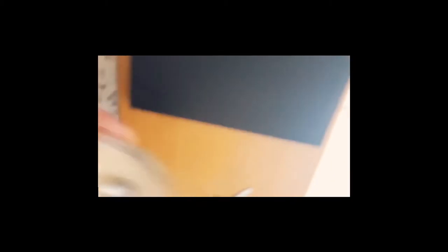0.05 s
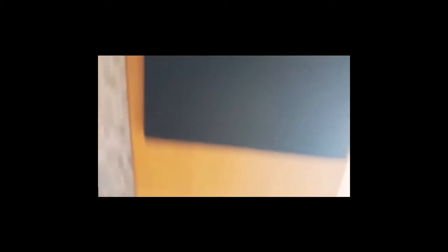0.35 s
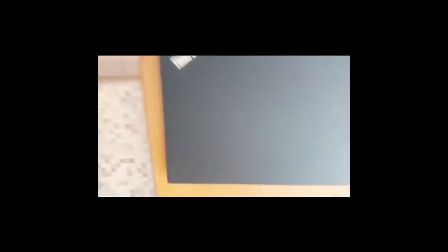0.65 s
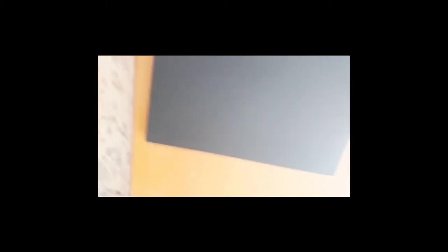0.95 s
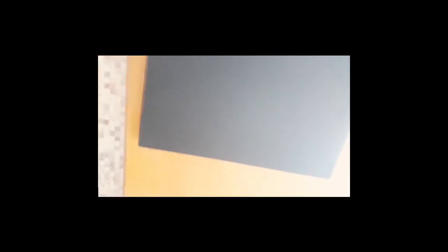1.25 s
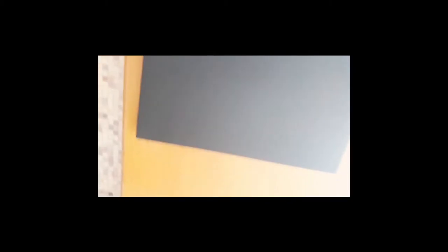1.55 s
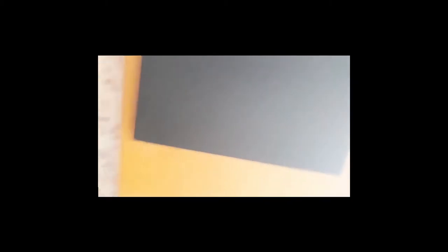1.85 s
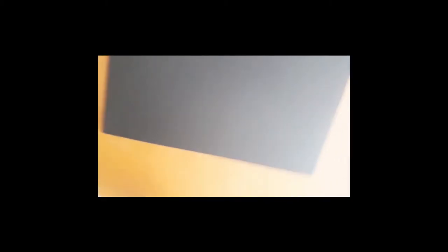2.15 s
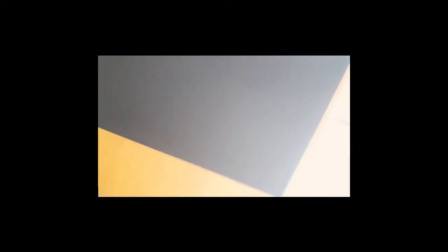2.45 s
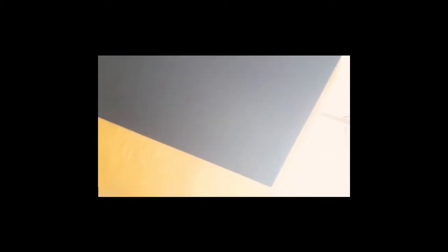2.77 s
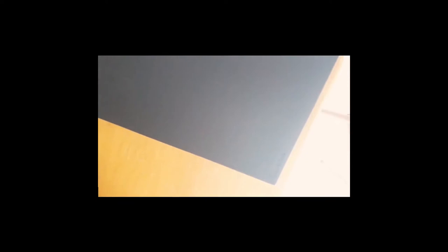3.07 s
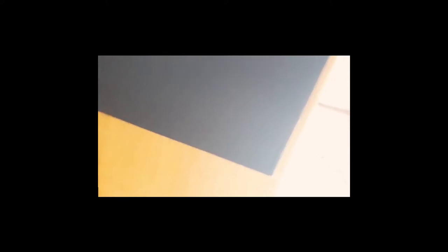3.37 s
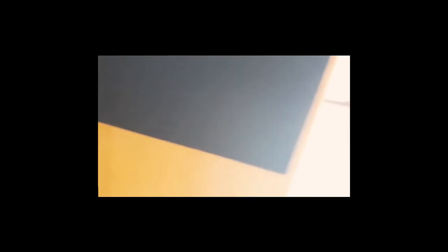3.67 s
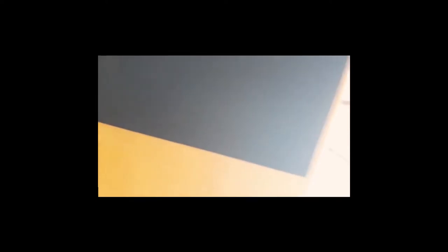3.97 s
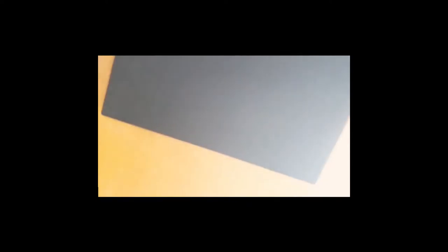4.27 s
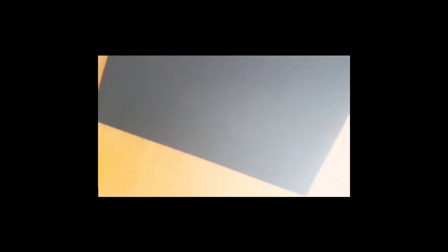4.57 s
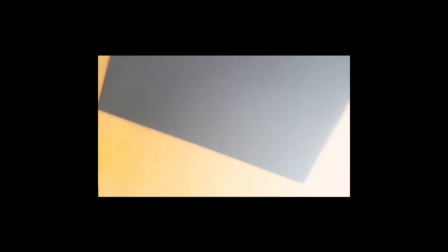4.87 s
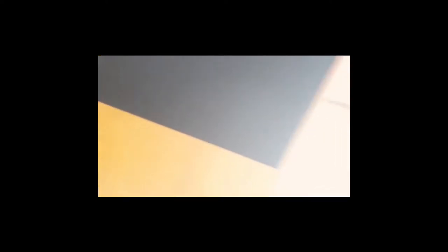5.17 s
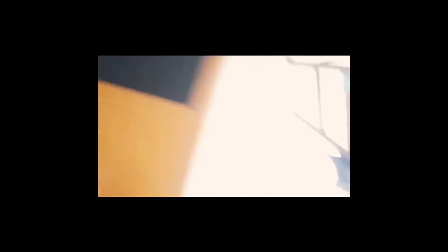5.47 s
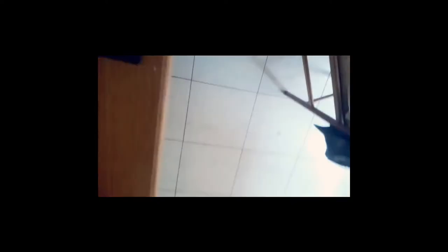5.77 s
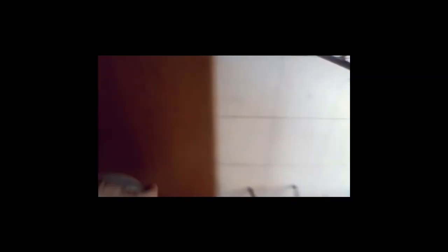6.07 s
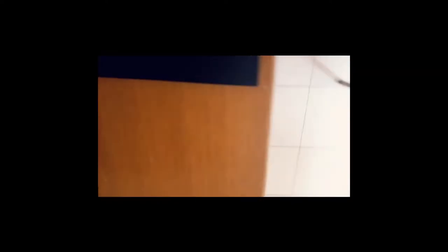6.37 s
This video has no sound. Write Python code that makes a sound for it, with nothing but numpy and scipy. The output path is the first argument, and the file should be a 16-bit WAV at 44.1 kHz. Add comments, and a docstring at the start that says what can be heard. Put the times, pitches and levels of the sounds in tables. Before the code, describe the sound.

A laptop comes down on a wooden desk in a tiled room, one side then the other, with a loud double knock that rings briefly. Clusters of sharp plastic clacks, lighter clunks, small creaking ticks and short scrapes follow as it is rocked and shifted into position. Soft brushes of a hand or sleeve come at the start and near the end, over a faint steady hiss.

```python
"""A hand or sleeve brushes softly, then two thumps sound as a laptop is set down on a wooden desk. Low pitches
sound with the thumps, and each impact jolts loose metal in the case. As the laptop is nudged, rocked and slid
into place, its feet bump, its plastic shell clacks and creaks, and its underside scrapes the wood by stick-slip
friction. The tiled room reverberates over a faint hiss."""
import sys
import numpy as np
from scipy import signal
from scipy.fft import rfft, irfft
from scipy.io import wavfile

SR = 44100
rng = np.random.default_rng(int(sys.argv[2]) if len(sys.argv) > 2 else 0)


def bounce(signal):
    """Save signal as a 16-bit WAV file at the path given by the first command-line argument."""
    frames = np.transpose(np.atleast_2d(signal))
    limited = np.clip(frames, -1, 1)
    pcm = np.round(limited * 32767).astype(np.int16)
    wavfile.write(sys.argv[1], SR, pcm)


N = 283122
SIZE = 49152  # samples in one event
T = np.arange(SIZE) / SR
HZ = np.maximum(np.arange(SIZE // 2 + 1) * SR / SIZE, 1)

# the laptop landing twice on the same spot: t/s, corner level/dB, weight level/dB
LANDINGS = [(1.3231, -19.5, -18), (1.4018, -22.5, -20)]
# lighter bumps as it is shifted: t/s, level/dB, centre f/Hz, spread/octaves
KNOCKS = [(.503, -56, 454, 0.12), (.565, -59, 666, 0.11), (2.261, -43, 796, 2.8), (2.291, -33, 600, 2.1),
          (2.620, -23, 2690, 0.37), (2.621, -25, 1240, 0.25), (2.622, -22, 674, 0.21),
          (2.708, -27, 716, 0.77), (2.838, -33.5, 620, 0.3), (2.906, -35, 570, 0.97),
          (3.583, -41, 720, 0.57), (3.587, -34, 836, 0.03), (4.4122, -41.5, 960, 0.18),
          (4.626, -40.5, 315, 0.72), (4.860, -33, 320, 0.7), (5.53, -39, 310, 0.094),
          (5.6505, -27, 1360, 0.59), (5.654, -32, 374, 0.25)]
# plastic shell contacts: t/s, level/dB, favoured f/Hz, its boost/dB, bass/dB, decay/s
CLACKS = [(2.277, -29.5, 5140, 13, 3.5, 0.0033), (2.363, -26, 5040, 14, 1, 0.0074),
          (2.5516, -39, 3360, 5, 8, 0.0048), (2.6695, -23.5, 2480, 0, -1.5, 0.0017),
          (2.706, -16.5, 4700, 9.5, -15, 0.0022), (2.7105, -19, 1750, 5.5, -15, 0.0037),
          (2.835, -23.5, 2890, 3, 0.5, 0.0054), (4.18, -47, 5000, 15, -10, 0.0042),
          (4.192, -43, 4020, 8, -15, 0.0014), (4.411, -33.5, 4380, 8.5, -2, 0.0064),
          (4.631, -21.5, 3850, 23, -22, 0.001), (4.634, -16, 3830, 18.5, -18.5, 0.0013),
          (4.6390, -26, 3880, 2, -20, 0.0017), (4.647, -19.5, 2540, -2, -15, 0.0065),
          (4.8132, -30.5, 2560, 12, -9, 0.0042), (4.8447, -21.5, 2570, 6, -15, 0.011),
          (4.8603, -20.5, 4340, 5.5, -9.5, 0.0079), (4.884, -24.5, 2660, 13.5, -14, 0.00089),
          (4.922, -27.5, 2490, 5.5, 0, 0.0073), (5.462, -47, 2270, 10, 8, 0.037),
          (5.506, -43, 2560, 13.5, 3, 0.042), (5.6294, -35.5, 5260, 8, -6, 0.012),
          (5.661, -26.5, 4140, 8, 5, 0.0072), (5.6835, -24, 3700, 2, -22, 0.006),
          (5.7, -22.5, 3970, 0, -31, 0.021)]
# the stressed case creaking in single ticks: t/s, level/dB, f/Hz
TICKS = [(3.0727, -49, 2700), (3.209, -50, 2920), (3.2837, -38.5, 3700), (3.2919, -44.5, 2470),
         (3.3331, -28, 3880), (3.3570, -35, 2030), (3.413, -41, 1820), (3.579, -39.5, 2600),
         (3.583, -38, 4020), (3.9332, -44, 1760), (3.972, -43, 1660), (4.051, -38, 1990),
         (4.392, -41.5, 4430), (4.418, -44.5, 4420), (4.473, -34.5, 2400), (4.525, -43, 2560),
         (4.607, -41, 3640), (4.614, -33.5, 4000), (5.622, -46, 2580)]
# the underside sliding on wood: t/s, duration/s, level/dB, bass/dB, treble/dB
SCRAPES = [(2.27, 0.2, -40.5, 11, 4), (2.291, 0.019, -25.5, -5.5, 12), (3.555, 0.055, -44.5, 7.5, 1),
           (4.172, 0.025, -39, -7, -1), (5.34, 0.14, -52, -5, -26), (5.49, 0.32, -52, 12, 2),
           (5.655, 0.053, -45, -24, 15)]
# a hand or sleeve brushing past: t/s, duration/s, level/dB, bass/dB, treble/dB
BRUSHES = [(0, 0.14, -45.5, -4, 12.5), (.15, 0.81, -65.5, -23, 0), (1.872, 0.034, -44.5, -1, -1),
           (5.27, 0.14, -51, -10, 17.5), (6.25, 0.091, -52, -6, 8.5)]
# tone colour of each sound as heard, including the microphone's high sheen: f/Hz, relative level/dB
THUMP_COLOUR = [(40, -35.5), (70, 4.5), (115, -2), (150, 4), (240, 2.5), (560, 1.5), (1000, -2.5),
                (1400, -3), (1800, -4.5), (2900, -1), (3500, -6), (7000, -12), (8200, -49.5),
                (14000, -17.5)]
RATTLE_COLOUR = [(300, -25), (2300, -14), (2950, -4), (3500, -18), (4200, -12), (4700, 1), (5100, -7),
                 (5600, -19), (6600, -9), (8200, -30), (13500, -28)]
SHELL_COLOUR = [(60, -23), (250, -8.5), (700, -3.5), (1500, -6.5), (2300, 6), (3300, -3), (4200, -0.5),
                (5700, -9), (6900, -10), (7900, -26), (9500, -25.5), (11000, -20), (13300, -17),
                (14500, -42)]
CREAK_COLOUR = [(200, -58.5), (1250, -36), (1600, -12.5), (1950, -4), (2400, 1.5), (3200, -1.5), (4100, -4),
                (6800, -12), (8200, -28.5), (13000, -21), (14500, -37.5)]
BRUSH_COLOUR = [(25, -20), (120, 0), (700, -9.5), (1600, 6.5), (3000, 7.5), (4800, 3.5), (6500, -6),
                (8200, -24), (10500, -24.5), (13000, -13.5), (14500, -46)]
# low pitches that sound with the thumps: f/Hz, relative peak level/dB, T60/s
THUMP_TONES = [(99, 11, .6), (153, 13, .8), (191, 13, .6), (241, 15, .65), (253, 14, .55), (328, 12, .5),
               (381, 16, .45), (468, 12, .45), (544, 20, .4), (580, 19, .42), (759, 16, .35),
               (885, 17, .45), (1062, 15, .5), (1362, 11, .37)]
# ringing modes of the loose metal and of the shell: f/Hz, relative peak level/dB, T60/s
METAL_MODES = [(2934, 19, .4), (3074, 17, .5), (3881, 16, .6), (4565, 15, .3), (4770, 14, .38),
               (5000, 11, .35), (6508, 19, .44), (6700, 16, .4), (7520, 20, .3)]
SHELL_MODES = [(1836, 16, .4), (2025, 17, .45), (2330, 13, .5), (2535, 16, .55), (2730, 12, .4),
               (3100, 12, .42), (3711, 15, .45), (3903, 15, .45), (4058, 14, .4), (4300, 14, .4),
               (4516, 14, .3), (4791, 12, .5), (5140, 11, .3), (6309, 12, .3)]
# reverberation time of the room: f/Hz, T60/s
ROOM_T60 = [(100, 0.59), (260, 0.8), (700, 0.71), (1800, 0.73), (3000, 0.61), (5000, 0.7), (8000, 0.53),
            (13000, 0.42)]
# spectral density of the quiet room: f/Hz, relative level/dB
HISS_SPECTRUM = [(15, -56.5), (25, -35.5), (113, -6.5), (187, -9), (301, -4), (372, -11), (436, -8),
                 (511, -13), (2570, -16.5), (7420, -34), (14000, -33)]


def landings(tails):
    """Two-stage impact: a hard corner strikes briefly, then the weight gives a longer, lower push."""
    out, ring = np.zeros(N), ringing(THUMP_TONES)
    weight_lag_s = .0048
    for s, corner_db, weight_db in LANDINGS:
        tail = spot(tails, s)
        corner = bump(tail, ring, hz=1210, octaves=0.58, lowest_hz=72, decay_s=0.0014, room_db=-15)
        weight = bump(tail, ring, hz=415, octaves=1.19, lowest_hz=72, decay_s=0.0094, room_db=3.5)
        add(out, s, amp(corner_db) * corner)
        add(out, s + weight_lag_s, amp(weight_db) * weight)
    return out


def knocks(tails):
    """Contact stiffness sets the spectrum: a softer bump lasts longer and reaches deeper."""
    out, ring = np.zeros(N), ringing(THUMP_TONES)
    for s, db, hz, octaves in KNOCKS:
        hardness = hz / 710  # one for a typical bump
        lowest_hz = 285 * hardness ** 0.28
        decay_s = 0.0071 / hardness ** 0.15
        room_db = 2.5 + 1.5 * np.log2(octaves / 0.64)  # broad bumps ring on more loudly
        add(out, s, amp(db) * bump(spot(tails, s), ring, hz, octaves, lowest_hz, decay_s, room_db))
    return out


def bump(tail, ring, hz, octaves, lowest_hz, decay_s, room_db, hard_s=0.0047, loaded_hz=90):
    """Impact and decay: a blow thumps the desk, then low pitches sound and the room rings on."""
    band_db = -17 * np.log10(1 + .5 * (np.log2(HZ / hz) / octaves) ** 2)
    low_cut_db = -20 * np.log10(1 + (lowest_hz / HZ) ** 3)
    tone_db = read(THUMP_COLOUR, HZ) + band_db + low_cut_db + panel_ripple(3.6, 90.3)
    snap = 1.12 * min(hard_s / decay_s, 1) ** 2  # long contacts start softly
    touch = contact(decay_s / 10, decay_s, snap)
    swing_db = accent(hz, boost_db=4, octaves=0.1)  # the case swings a few times on its feet
    thump = colour(touch, tone_db + swing_db)
    load = min(loaded_hz / lowest_hz, 1)  # the low pitches are weaker after light taps
    aftersound = colour(amp(-4) * tail + load * amp(-7.5) * ring, tone_db)
    return thump + amp(room_db) * aftersound


def rattles(tails, lag_s=.0172, below_corner_db=6):
    """Secondary impact: thin, loose metal jumps after each landing and rings in a few clear modes."""
    out, ring = np.zeros(N), ringing(METAL_MODES)
    for s, corner_db, _ in LANDINGS:
        blow = contact(rise_s=0.00021, decay_s=0.0071) + amp(-7) * (spot(tails, s) + ring)
        add(out, s + lag_s, amp(corner_db - below_corner_db) * colour(blow, read(RATTLE_COLOUR, HZ)))
    return out


def clacks(tails):
    """Selective excitation: each spot on the shell favours one panel resonance over the case's ring."""
    out, ring = np.zeros(N), ringing(SHELL_MODES)
    for s, db, hz, boost_db, bass_db, decay_s in CLACKS:
        treble_db = 2.5 * np.log2(0.011 / decay_s)  # brief contacts are brighter
        tone_db = read(SHELL_COLOUR, HZ) + accent(hz, boost_db, octaves=0.08)
        tone_db += shelves(bass_db, treble_db)
        room_db = -2 - 0.24 * boost_db  # the more one panel takes of the blow, the less rings on
        aftersound = spot(tails, s) + amp(-5) * ring
        blow = contact(decay_s / 4, decay_s) + amp(room_db) * aftersound
        add(out, s, amp(db) * colour(blow, tone_db + panel_ripple(4.3, 107.13)))
    return out


def ticks(tails):
    """Stress release: a plastic seam slips once, short, pitched and with no weight on the desk."""
    out = np.zeros(N)
    for s, db, hz in TICKS:
        treble_db = 12.5 * np.log2(hz / 2600)  # higher ticks are brighter
        tone_db = read(CREAK_COLOUR, HZ) + accent(hz, boost_db=10.5, octaves=.11)
        tone_db += shelves(0, treble_db, treble_hz=4630)
        blow = contact(rise_s=0.0018, decay_s=0.0037) + amp(-8) * spot(tails, s)
        add(out, s, amp(db) * colour(blow, tone_db))
    return out


def friction(strokes, timbre, tails, grain_db, room_db, ripple_db):
    """Stick-slip friction: tiny slips of uneven strength swell and fade with each stroke."""
    out = np.zeros(N)
    for s, length_s, db, bass_db, treble_db in strokes:
        grip = np.repeat(rng.standard_normal(SIZE // 64), 64)  # changes about every 1.5 ms
        slips = unit(rng.standard_normal(SIZE) * amp(grain_db * grip)) * np.sqrt(SIZE)
        slips *= np.sin(np.pi * np.minimum(T / length_s, 1))
        reverberation = signal.fftconvolve(slips, spot(tails, s))[:SIZE]
        tone_db = read(timbre, HZ) + shelves(bass_db, treble_db) + panel_ripple(ripple_db, 100)
        add(out, s, amp(db) * colour(slips + amp(room_db) * reverberation, tone_db))
    return out


def contact(rise_s, decay_s, snap=0):
    """Transient excitation: the touch grips, then a crowd of heavily damped panel modes dies away."""
    envelope = (1 - np.exp(-T / max(rise_s, 1 / SR))) * np.exp(-T / max(decay_s, 1 / SR))
    crowd = unit(rng.standard_normal(SIZE) * (envelope + 1e-12))
    crowd[0] += snap  # impulse at the onset
    return unit(crowd)


def ringing(tones):
    """Exponential decay: the ring after a unit blow is a sum of damped sinusoids."""
    hz, db, t60 = np.transpose(tones)[:, :, None]
    tau = t60 / np.log(1000)
    return np.sum(2 * amp(db) / (tau * SR) * np.exp(-T / tau) * np.sin(2 * np.pi * hz * T), axis=0)


def panel_ripple(depth_db, spacing_hz):
    """Modal coupling: the struck spot excites some upper panel modes and misses others."""
    steps = rng.standard_normal(SIZE)
    return depth_db * np.interp(HZ / spacing_hz, np.arange(SIZE), steps) * HZ / (HZ + 700)


def accent(hz, boost_db, octaves):
    """Resonance: one peak, as a dB curve."""
    return boost_db / (1 + (np.log2(HZ / hz) / octaves) ** 2)


def shelves(bass_db, treble_db, bass_hz=1400, treble_hz=5500):
    """Spectral balance: weight behind a contact brings bass; a harder edge brings treble."""
    return bass_db / (1 + (HZ / bass_hz) ** 4) + treble_db / (1 + (treble_hz / HZ) ** 4)


def room_tails(count=12, build_s=0.0083, patchiness=0.71, absorbed_db=-2):
    """Reverberation from several spots on the desk: uneven echoes build up, the treble dies first."""
    centres_hz = np.geomspace(100, 13000, count)
    split = np.array([np.interp(np.log(HZ), np.log(centres_hz), row) for row in np.eye(count)])
    t60 = read(ROOM_T60, centres_hz)[:, None]
    envelope = np.exp(-np.log(1000) * T / t60) * (1 - np.exp(-(T / build_s) ** 2))
    share = np.sqrt(t60 * split.sum(axis=1, keepdims=True))  # slow, wide bands store more energy
    share *= amp(absorbed_db * centres_hz[:, None] / centres_hz[-1])  # air and walls soak up the top
    unevenness = patchiness * np.exp(-T / 0.11)
    tails = []
    for _ in range(count):
        echoes = rng.standard_normal(SIZE) * np.exp(unevenness * rng.standard_normal(SIZE))
        bands = irfft(rfft(echoes) * split) * envelope
        tails.append(unit(np.sum(share * bands / bands.std(axis=1, keepdims=True), axis=0)))
    return tails


def spot(tails, s):
    """Echoes depend on source position: contacts in the same half second share one spot."""
    return tails[int(2 * s) % len(tails)]


def hiss(rms_db=-61.5):
    """Stationary noise: the steady background of the room."""
    hz = np.maximum(np.arange(N // 2 + 1) * SR / N, 1)
    spectrum = rfft(rng.standard_normal(N)) * amp(read(HISS_SPECTRUM, hz))
    return amp(rms_db) * np.sqrt(N) * unit(irfft(spectrum, N))


def colour(x, db):
    """Minimum-phase filtering by a dB curve: causal, and white noise keeps its power."""
    gain = amp(db)
    cepstrum = irfft(np.log(gain / np.sqrt(np.mean(gain ** 2))))
    cepstrum[1:SIZE // 2] *= 2
    cepstrum[SIZE // 2 + 1:] = 0
    return irfft(rfft(x) * np.exp(rfft(cepstrum)))


def amp(db):
    """Decibels to amplitude ratio."""
    return 10 ** (np.asarray(db) / 20)


def read(points, hz):
    """Interpolation of (f/Hz, value) points on a log-frequency axis."""
    f, value = np.transpose(points)
    return np.interp(np.log(hz), np.log(f), value)


def unit(x):
    """Normalisation to unit energy."""
    return x / np.sqrt(np.sum(x ** 2))


def add(out, s, x):
    """Superposition of x on out from time s."""
    i = max(int(s * SR), 0)
    out[i:i + len(x)] += x[:max(N - i, 0)]


def scene():
    """Linear superposition: blows, slides, brushes and hiss add in one room."""
    tails = room_tails()
    blows = landings(tails) + knocks(tails) + clacks(tails) + rattles(tails) + ticks(tails)
    blows *= np.sqrt(.01 * SR)  # a blow's level is its energy spread over 10 ms
    scrapes = friction(SCRAPES, SHELL_COLOUR, tails, grain_db=6, room_db=-6, ripple_db=5)
    brushes = friction(BRUSHES, BRUSH_COLOUR, tails, grain_db=2, room_db=-2, ripple_db=0.5)
    return (blows + scrapes + brushes + hiss())[None]


def record(dry):
    """Band limiting: a steep low-pass filter cuts the highest treble."""
    cutoff_hz = 13900
    return signal.sosfilt(signal.ellip(8, .2, 70, cutoff_hz, fs=SR, output="sos"), dry)


dry = scene()
out = record(dry)
bounce(out)
```